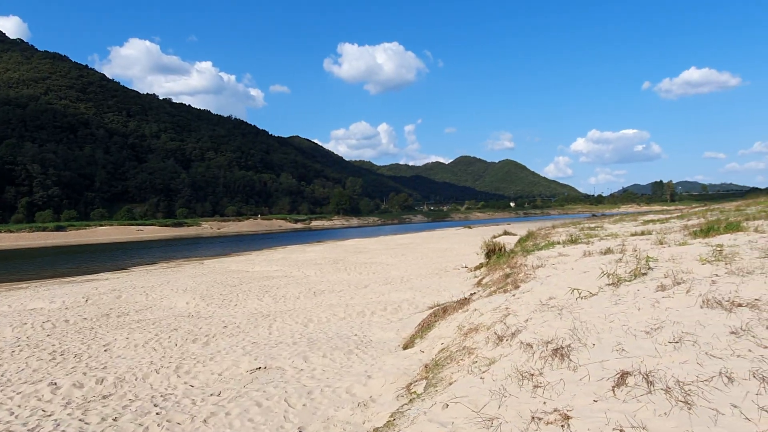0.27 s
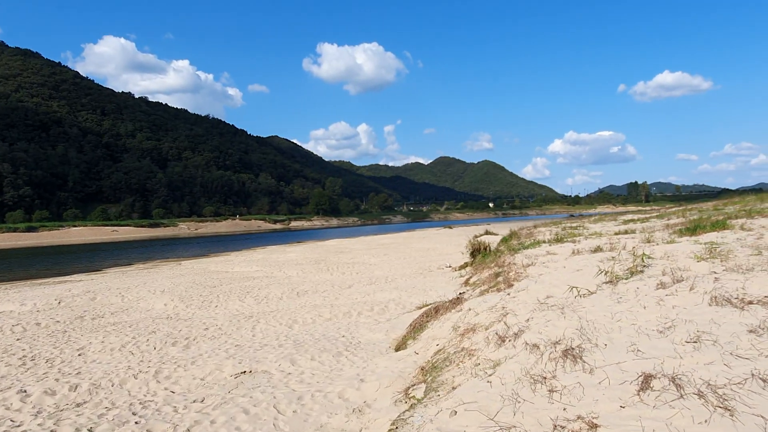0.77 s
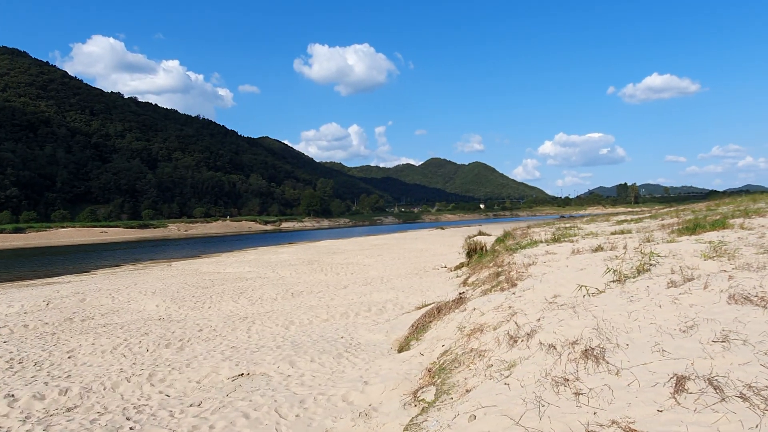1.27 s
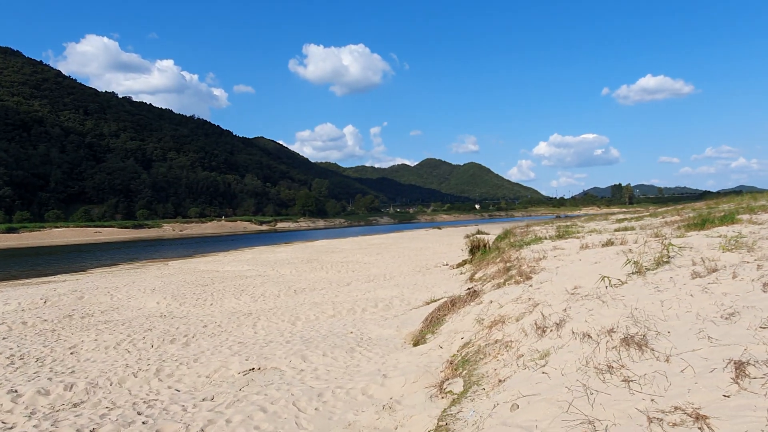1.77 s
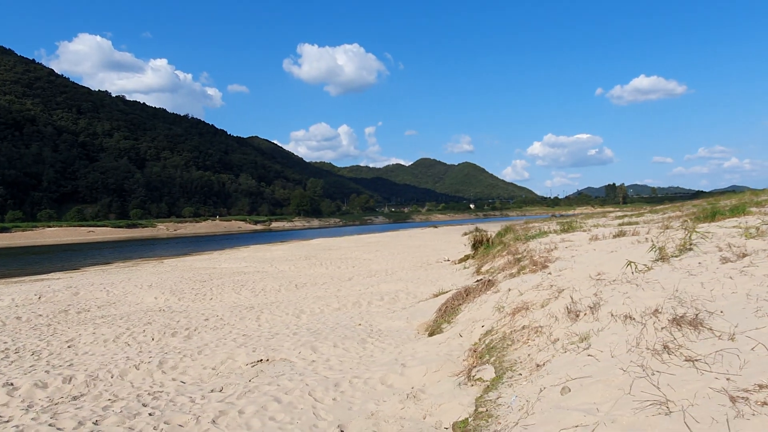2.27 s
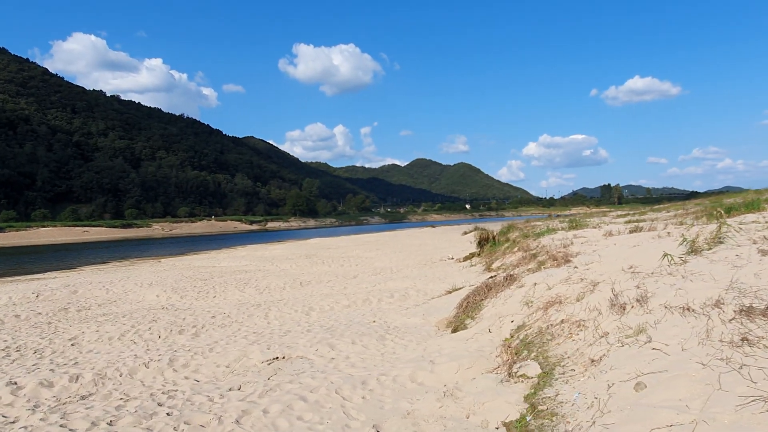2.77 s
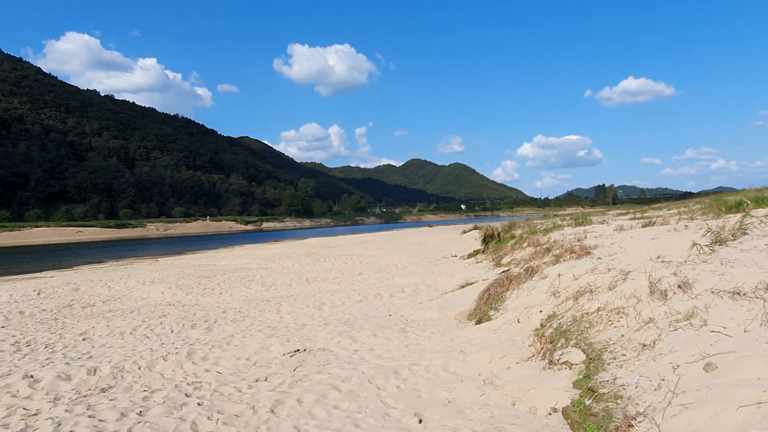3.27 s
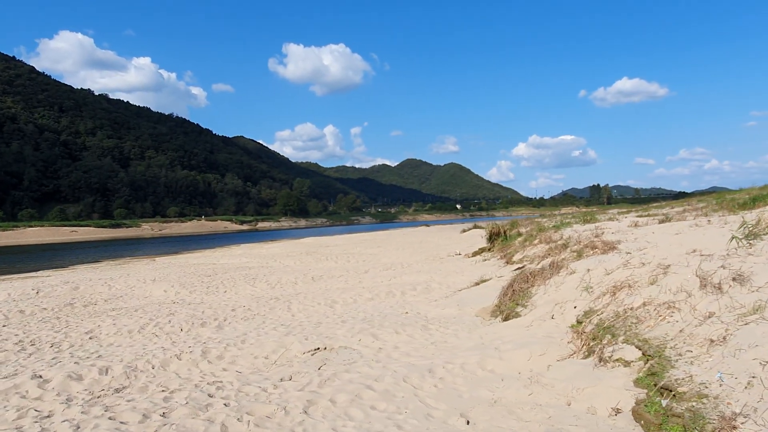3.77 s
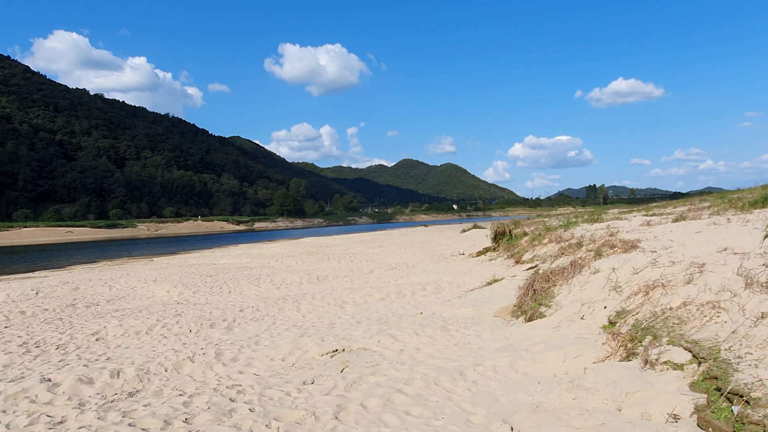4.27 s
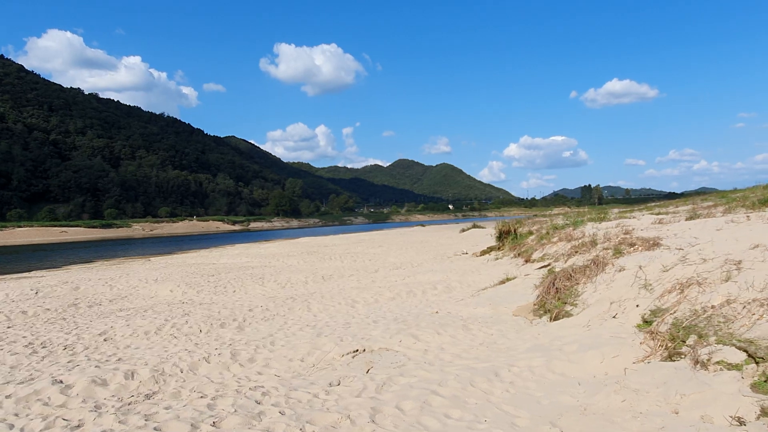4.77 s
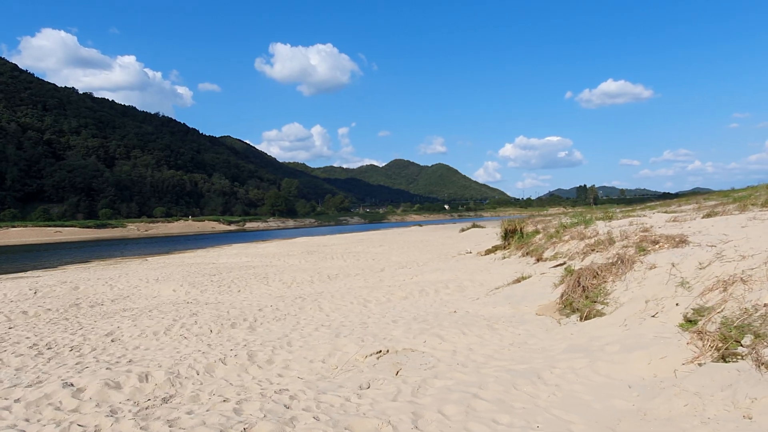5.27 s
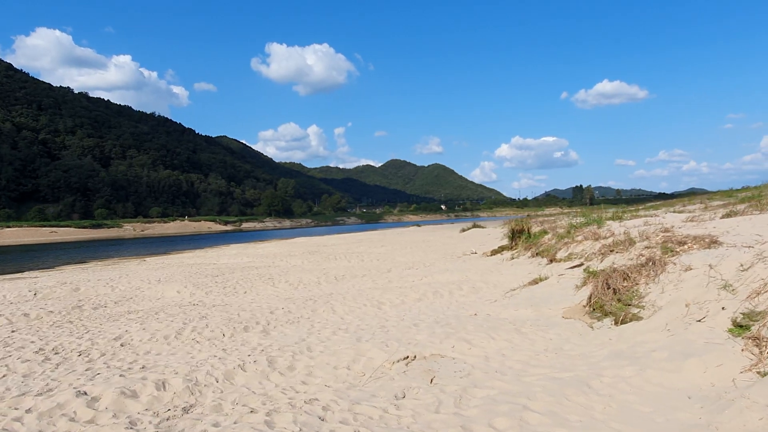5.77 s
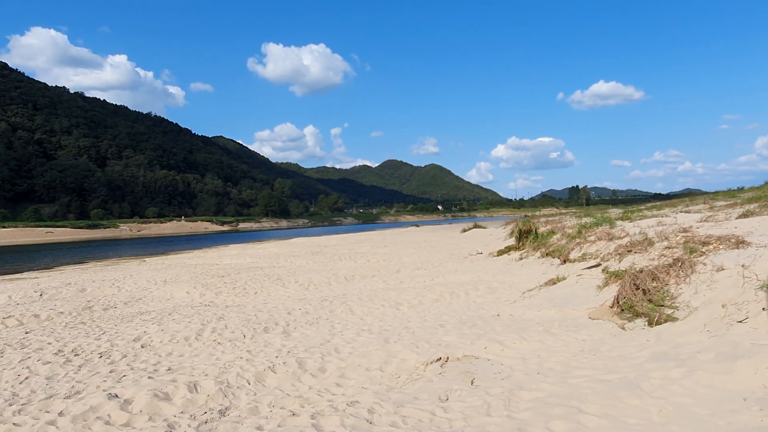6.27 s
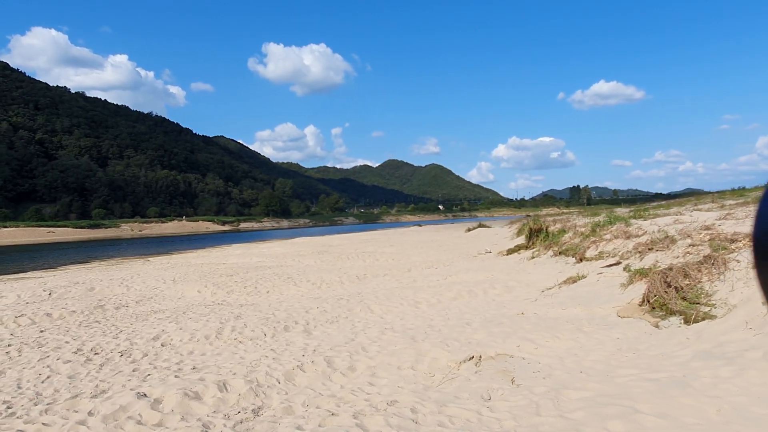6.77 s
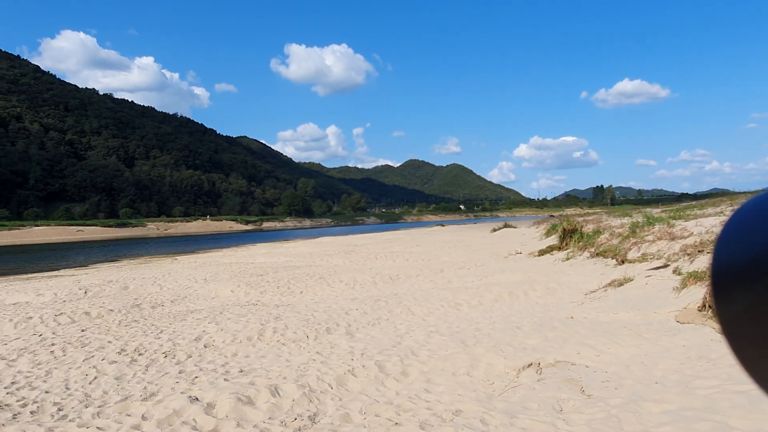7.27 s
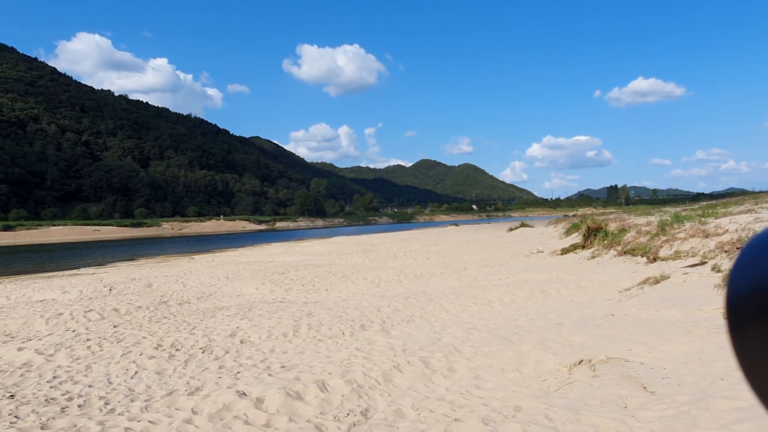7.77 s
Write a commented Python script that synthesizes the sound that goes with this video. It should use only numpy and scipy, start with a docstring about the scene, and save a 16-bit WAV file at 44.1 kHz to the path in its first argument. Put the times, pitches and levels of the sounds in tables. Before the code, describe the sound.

Five deep, throbbing bullfrog croaks sound nearby over a soft river murmur and the faint peeping of small frogs.

```python
"""Bullfrog on a river bank

A close bullfrog gives five long, rattling croaks, each in two or three throbs. Every snap of its vocal
folds is a short falling chirp that rings in throat and vocal sac, about a hundred times a second.
Small frogs peep and hoarse calls drift in from far off, wind bumps the microphone, air rushes over
the bank, and the river murmurs under a thin hiss and a few faint ticks."""
import sys
import numpy as np
from scipy import signal
from scipy.fft import rfft, irfft, next_fast_len
from scipy.io import wavfile
from scipy.ndimage import uniform_filter1d

SR = 44100
rng = np.random.default_rng(int(sys.argv[2]) if len(sys.argv) > 2 else 0)


def output_pcm(signal):
    """Save a mono or channel-first signal as 16-bit PCM at the path in sys.argv[1].

    Samples are clipped to [-1, 1] before scaling.
    """
    pcm = np.clip(np.atleast_2d(signal).T, -1, 1) * 32767
    wavfile.write(sys.argv[1], SR, np.round(pcm).astype(np.int16))


N = 353196
TIME = np.arange(N) / SR

# The croaks. Each row: start and end in seconds, level in dB, fade across the croak in dB, rasp in dB,
# share of the croak at which the membranes ring fully, roughness, chirp sweep in seconds,
# side angle as a factor on the left port's lead, left-right balance in dB.
CROAKS = [(0.463, 1.541, -0.5, -0.5, 0.5, 0.76, 12.5, 0.0027, 0.86, -2),
          (2.058, 3.002, 0, 3, 0.5, 0.65, 14, 0.0028, 0.96, -3.5),
          (3.544, 4.415, 0.33, 6, 2.5, 0.64, 14.5, 0.0026, 1.12, -2.5),
          (4.975, 5.751, 0.5, 6.5, 2, 0.57, 13.5, 0.0027, 1.08, -3.5),
          (6.366, 7.161, 0.5, 5.5, 0.5, 0.63, 9.5, 0.0037, 0.73, -3)]
# Snap rate, by croak. Each row: opening and top rate in Hz, shares of the croak where it rises and droops.
PITCH_ARCHES = [(97.2, 101.3, .54, .8), (97.8, 102.3, .52, .79), (98.2, 102.8, .4, .77),
                (98.4, 102.8, .4, .78), (97.8, 101.2, .38, .73)]
# Mouth colour, by croak. Each row: nasal peak in Hz, its gain in dB, hollow in Hz, its gain in dB.
MOUTHS = [(1900, 7.5, 1870, -1), (1790, 3.5, 2430, -5.5), (1450, 6, 1800, 4.5), (1940, 7, 2430, -7.5),
          (1930, 6.5, 3200, -1)]
# Lows and highs, by croak. Each row, in dB: boom, membrane ring before the sac stretches,
# overtones before, overtones after.
TONE_TRIMS = [(-1, -18, -18, -2.5), (-1.5, -17.5, -10, 3), (0, -10.5, -6, 4.5), (0.5, -12.5, -3, -1),
              (-2, -15.5, -9.5, -4.5)]
# Hard snaps that crack out of the rattle. Each row: time in seconds, accent in dB.
HARD_SNAPS = [(0.6277, 0.5), (.658, 3.5), (0.6991, 3.5), (0.762, 2.5), (0.803, 3), (.843, 3.5), (0.875, 4),
              (0.9768, 0), (1.0486, 0), (1.1501, 1), (2.212, 3), (2.2533, 2.5), (2.2934, 2), (2.325, 2),
              (2.3553, 2), (2.3963, 2), (2.4165, 5), (2.5084, -1), (3.6646, 4), (3.7063, 4.5), (3.736, 0.5),
              (3.7768, 0.5), (3.837, 2), (3.9189, 1.5), (3.989, 3.5), (5.099, 3), (5.1294, 0.5),
              (5.2715, 1), (5.342, 2), (5.4511, 3), (6.487, -2.5), (6.5185, 0.5), (6.549, 1), (6.6613, 0),
              (6.762, 4), (6.9508, 1.5)]
# The lungs slacken once or twice a croak, parting it into two or three throbs.
# Each row: time of the new push in seconds, length of the slack in seconds, relative depth.
SLACKS = [(0.974, 0.091, 1), (1.216, 0.062, 0.5), (2.504, 0.11, 0.5), (2.724, 0.054, 0.5),
          (3.911, 0.098, 0.5), (4.12, 0.046, 0.3), (5.33, 0.1, 0.3), (5.494, 0.064, 0.5), (6.756, 0.11, 0),
          (6.949, 0.061, 0.5)]
# Colour of a snap in the tight sac and in the swollen one. Each row: frequency in Hz, gain in dB.
TIGHT_EQ = [(120, -73), (230, -28.5), (320, -9), (520, 1), (680, -7), (860, -4.5), (1100, 8), (1330, -12.5),
            (1650, -10), (2350, -19), (2850, -11.5), (3500, -42), (4200, -26), (4800, -37), (5500, -60)]
SWOLLEN_EQ = [(120, -48), (230, -12), (320, -7.5), (560, -4), (900, 18.5), (1550, 10), (2000, 7),
              (2400, 12), (2750, 14.5), (3150, 10), (3500, -2), (3850, -9), (4350, -17.5), (5800, -41)]
# Resonances and dips of the swollen sac and eardrums. Each row: centre in Hz, width in Hz, gain in dB.
SAC_RESONANCES = [(369, 180, 12), (570.3, 80, 15.5), (694, 34, 13), (832, 230, -3), (885, 24, 4.5),
                  (1020, 60, -2.5), (1170, 116, 8.5), (1354, 122, -9.5), (1618, 36, 5.5), (1556, 290, 3),
                  (3740, 170, 10)]
# Crossovers in Hz: the tops of the boom, chest, throat, nasal core and rasp bands.
CROSSOVERS_HZ = [540, 950, 1350, 2350, 4200]
# Envelopes of those five bands, the membrane ring and its overtones. Each row: level in dB, shares of
# the croak where it is open and starts closing, attack depth in dB, sag in dB per croak,
# release depth in dB, dip in dB per unit of slack.
BAND_ENVELOPES = [(-42.5, 0.36, 0.886, 33, -2.5, 43, 15), (-38.5, 0.31, 0.77, 35, 6, 85, 2.5),
                  (-36.5, 0.15, 0.79, 31, 1, 90, 2.8), (-28.5, 0.26, 0.73, 60.5, 3.5, 47, 13.8),
                  (-32.5, 0.29, 0.74, 77, 3, 52, 14.3), (-41, 0.34, 0.78, 113, 7.5, 84, 18),
                  (-52.5, 0.31, 0.81, 90, 10.5, 106, 26)]
# Membrane resonances slide down as the sac stretches. Each row: share of the croak, then in Hz
# lower ring, upper ring, lower overtone, upper overtone and their common width.
RING_GLIDE = [(0, 5600, 6000, 7200, 8600, 700), (.24, 5480, 5720, 7000, 8300, 330),
              (.36, 5150, 5420, 6850, 7700, 280), (.48, 4780, 5220, 6450, 7250, 140),
              (.62, 4700, 5170, 6350, 6980, 105), (.75, 4630, 5050, 6350, 6950, 105),
              (.9, 4590, 4800, 6200, 6850, 190)]
# Balance of those four resonances in dB, in the same order.
RING_MODES_DB = [-0.5, -2, 2.5, 0.5]
# Reflections off the water and the near bank. Each row: delay in seconds, gain in dB.
ECHOES = [(.0033, -15), (.0054, -18.5)]
# The frog at the two microphone ports. Each row: frequency in Hz, left lead in radians, balance in dB.
PORTS = [(101, .1, 32), (326, 0.64, -3.5), (560, 0.99, 1), (1380, 1.88, 6.5), (1970, 1.78, 4.5),
         (2695, 3.65, 3), (3060, 4.26, 5.5), (5330, 6.9, 1), (6820, 9.25, 7.5)]

# Bouts of the small frogs. Each row: time and half width in seconds, level in dB, pitch in Hz.
CHORUS_BOUTS = [(.03, 0.081, -46, 2700), (0.224, 0.065, -37, 2686), (0.346, 0.029, -37.5, 2824),
                (.55, 0.055, -43, 2660), (0.68, 0.052, -31.5, 2610), (1.64, 0.081, -66, 2640),
                (1.82, 0.041, -47, 2876), (1.97, 0.063, -41, 2828), (2.16, 0.046, -46, 2753),
                (2.28, 0.054, -35.5, 2840), (2.91, 0.059, -43, 2948), (3.07, 0.047, -49.5, 2887),
                (3.23, 0.042, -45, 2887), (3.41, .035, -49.5, 2843), (3.63, 0.059, -43.5, 2830),
                (4.18, 0.067, -36, 2745), (4.379, 0.045, -45.5, 2500), (4.592, 0.031, -44, 2507),
                (4.88, 0.093, -40.5, 2810), (5.06, 0.043, -40.5, 2840), (5.659, .03, -41, 2590),
                (5.88, 0.11, -45, 2823), (6.199, 0.035, -49.5, 2820), (6.39, 0.07, -51.5, 2614),
                (7.2, 0.077, -49, 2763), (7.46, 0.037, -51.5, 2640), (7.69, 0.073, -45, 2858),
                (7.85, 0.065, -44.5, 2705)]
# Lone far whistles. Each row: start and length in seconds, pitch and glide in Hz, level in dB.
WHISTLES = [(1.705, 0.073, 1950, 71, -57), (3.418, 0.043, 1986, 28, -60), (4.413, 0.041, 2080, 162, -58),
            (5.738, 0.073, 2050, 143, -61), (6.008, 0.019, 2136, -34, -51), (7.43, 0.091, 2114, 117, -61),
            (7.8, 0.11, 1183, 16, -51)]
# Hoarse far calls. Each row: time and half width in seconds, pitch in Hz, level in dB.
FAR_CALLS = [(.04, 0.043, 1610, -62), (.15, 0.043, 1170, -48.5), (.28, 0.12, 1020, -55.5),
             (1.69, .04, 1130, -50), (4.66, 0.04, 1050, -58), (5.85, 0.062, 1820, -74),
             (6.15, 0.088, 1700, -64), (7.29, 0.034, 1080, -53.5), (7.3, 0.032, 1690, -61),
             (7.52, .028, 1430, -54), (7.66, 0.06, 1050, -53)]
# Dry ticks and dull taps. Each row: start in seconds, centre in Hz, level in dB, decay in seconds.
TICKS = [(.022, 280, -40, 0.021), (.43, 594, -44.5, 0.012), (1.68, 550, -37, 0.014),
         (2.414, 9100, -44.5, .003), (4.962, 2010, -59, .008), (5.924, 347, -41, 0.01)]
# Sharp bumps of wind. Each row: time and width in seconds, level in dB.
BUFFETS = [(1.269, 0.00052, -22), (1.302, 0.00097, -26.5), (1.677, 0.0013, -20), (2.006, 0.0014, -22),
           (2.154, .0022, -23), (2.188, 0.00067, -24), (2.236, 0.0024, -16), (3.213, 0.00034, -30)]

# Colours of the noise beds. Each row: frequency in Hz, relative gain in dB.
WIND_EQ = [(20, -31), (45, -2.5), (70, 1.5), (100, -5.5), (150, -15.5), (250, -20.5), (450, -17),
           (1000, -88), (3000, -97)]
RUSH_EQ = [(100, -38), (220, -30.5), (350, 0.5), (550, -4.5), (850, -9), (1400, -29), (4000, -41)]
RUSTLE_EQ = [(1000, -25), (3400, -1), (6500, -7), (9000, -5), (15000, -19)]
RIVER_EQ = [(30, -66), (200, -11.5), (370, 9.5), (700, 5.5), (1100, 9), (1500, 0), (2100, -5), (3200, -7.5),
            (4200, -38.5), (7000, -29.5), (15000, -17.5)]
HISS_EQ = [(1000, -49), (4000, -8), (7500, -12), (8500, -8.5), (10500, -8.5), (12500, -4.5), (14000, 2.5),
           (15000, -35), (16000, 6)]
# Fader rides of the beds. Each row: time in seconds, level in dB.
WIND_FADER = [(0, -60), (1.1, -47), (1.6, -46.5), (2.2, -47), (2.8, -42), (3.1, -55), (4.45, -64.5),
              (4.85, -48), (5.8, -63.5), (6.2, -64), (7.0, -58), (7.35, -70.5), (8, -69)]
RUSH_FADER = [(0, -74), (1.55, -76), (2.2, -44), (3.3, -48.5), (4.45, -57), (4.9, -51), (5.8, -58.5),
              (7.2, -61), (8, -66)]
RIVER_FADER = [(0, -53), (.35, -56), (1.65, -50.5), (3.1, -54), (3.45, -55.5), (4.55, -56.5), (4.9, -53),
               (6.1, -57.5), (7.3, -58), (7.6, -54), (8, -54)]
HISS_FADER = [(0, -65), (1, -56), (1.9, -62.5), (2.8, -57), (4, -55.5), (4.8, -63.5), (6.7, -58.5),
              (8, -65)]
# Short swells on top of the beds. Each row: time and half width in seconds, level in dB.
WIND_SWELLS = [(.03, 0.053, -44.5), (.28, 0.043, -42.5), (1.1, 0.013, -42), (1.27, 0.027, -44),
               (1.59, 0.047, -37.5), (1.87, 0.026, -38), (2.01, 0.053, -33.5), (2.225, 0.025, -26.5),
               (2.419, 0.012, -34), (2.67, 0.066, -38), (2.85, 0.05, -37), (3.72, 0.027, -41.5),
               (3.91, 0.052, -37.5), (4.14, 0.024, -44), (5.44, 0.015, -41), (5.58, 0.029, -45),
               (7.07, 0.068, -44), (7.62, 0.032, -50.5)]
RUSTLES = [(.33, 0.041, -72.5), (3.35, 0.23, -71.5), (4.66, 0.059, -67), (7.17, 0.064, -67),
           (7.65, 0.075, -68.5)]
HISS_SWELLS = [(.665, 0.033, -45.5), (1.38, 0.08, -51.5), (2.57, 0.21, -55), (3.37, 0.071, -56.5),
               (5.27, 0.12, -51), (6.26, 0.017, -62), (7.11, .04, -52.5)]


def bullfrog():
    """Five croaks, placed to one side and scattering faintly along the bank."""
    out = np.zeros((2, N))
    for row, pitch_arch, mouth, trims in zip(CROAKS, PITCH_ARCHES, MOUTHS, TONE_TRIMS):
        start, end, level_db, tiring_db, *voice, angle, pan_db = row
        span = slice(int(start * SR), int(end * SR))
        call = croak(TIME[span], pitch_arch, mouth, trims, *voice)
        gain = from_db(level_db + tiring_db * np.linspace(.5, -.5, len(call)))
        out[:, span] += at_ports(call * gain, angle, pan_db)
    return out + from_db(-15.5) * scatter(out, t60=0.18, dull_hz=3700)


def croak(t, pitch_arch, mouth, trims, rasp_db, ring_at, roughness, sweep_s):
    """One croak: chirping snaps ring in sac and membranes, each band on its own envelope."""
    stage = np.linspace(0, 1, len(t))   # share of the croak gone by
    pitch = snap_rate(stage, *pitch_arch)
    slack = sum(np.interp(t, [s - length_s, s - length_s / 2, s, s + .005], [0, depth, depth, 0])
                for s, length_s, depth in SLACKS)
    spectrum, hz = falling_chirps(fold_snaps(t, pitch, roughness), sweep_s)
    bands = vocal_sac(spectrum, hz, stage, *mouth) + membranes(irfft(spectrum)[:len(t)], stage)
    boom_db, held_db, *overtones_db = trims
    stretching = [ring_at - .18, ring_at]   # the ring is held back until the sac is stretched
    ring_db = np.interp(stage, stretching, [held_db, 0])
    trims_db = [boom_db, 0, 0, 0, rasp_db, ring_db, np.interp(stage, stretching, overtones_db)]
    out = sum(evened(band, span_s=0.055) * from_db(band_envelope(stage, slack, *shape) + db)
              for band, shape, db in zip(bands, BAND_ENVELOPES, trims_db))
    out += closing_note(bands[0], pitch, stage)
    return out * np.interp(stage, [0, .03, .96, 1], [0, 1, 1, 0])


def snap_rate(stage, low_hz, top_hz, rises_at, droops_at, rise_share=.21, droop_hz=15):
    """The pitch of the rattle: level at first, up a step, then falling ever faster."""
    rise = np.interp(stage, [rises_at, rises_at + rise_share], [low_hz, top_hz])
    return rise - droop_hz * np.interp(stage, [droops_at, 1], [0, 1]) ** 2


def fold_snaps(t, pitch, roughness, flutter_hz=28.5, puff_decay_s=.0011):
    """The folds snap in a fluttering beat that crests at the hard snaps and settles toward the close."""
    size = len(t)
    hard_s, accent_db = np.transpose([row for row in HARD_SNAPS if t[0] < row[0] < t[-1]])
    hard = ((hard_s - t[0]) * SR).astype(int)
    cycles = in_step(np.cumsum(pitch) / SR, hard)
    at = np.interp(np.arange(1, int(cycles[-1])), cycles, np.arange(size))
    chance, timing = rng.standard_normal((2, 256))[:, :len(at)]
    accented = np.abs(at[:, None] - hard).argmin(axis=0)
    chance[accented] = 0
    rough = roughness * np.interp(at / size, [0, .3, .55, .9], [1.7, 1.4, 1, .6])
    crest = np.cos(2 * np.pi * in_step(flutter_hz * (t - t[0]), hard)[at.astype(int)])
    level_db = rough * (.1 * crest + .06 * np.clip(chance, -1.5, 1.5))
    level_db[accented] += accent_db
    strength = from_db(level_db)
    jitter_s = .000019 * rough * np.interp(at / size, [0, .3, .5, .8, .9], [1.1, .9, .6, .45, .2])
    at = np.clip(at + jitter_s * SR * timing, 0, size - 2)
    before, part = at.astype(int), at % 1   # each click is split between two samples
    clicks = np.bincount(before, strength * (1 - part), size)
    clicks += np.bincount(before + 1, strength * part, size)
    # a short puff of turbulent air gives each snap a colour of its own
    puffs = signal.lfilter([1], [1, -np.exp(-1 / (puff_decay_s * SR))], clicks + 1e-18)
    breath = .1 * np.interp(np.arange(size) / size, [.75, .9], [1, .35])
    return clicks + breath * puffs * rng.standard_normal(size)


def falling_chirps(snaps, sweep_s, knee_hz=200, on_time_hz=1800, size=2 ** 16):
    """Lows leave later than highs, so each snap chirps down; gives the spectrum, near echoes included."""
    hz = np.fft.rfftfreq(size, 1 / SR)
    late_s = sweep_s * ((on_time_hz + knee_hz) / (hz + knee_hz) - 1)
    chirps = rfft(snaps, size) * np.exp(-2j * np.pi * np.cumsum(late_s) * hz[1])
    echoes = sum(from_db(db) * np.exp(-2j * np.pi * hz * s) for s, db in ECHOES)
    return chirps * (1 + echoes), hz


def vocal_sac(spectrum, hz, stage, nasal_hz, nasal_db, hollow_hz, hollow_db, mouth_width_hz=330):
    """The sac fills and slackens: five bands crossfade from its tight colour to its swollen and back."""
    mouth = [(nasal_hz, mouth_width_hz, nasal_db), (hollow_hz, mouth_width_hz, hollow_db)]
    peaks_db = sum(db / (1 + (2 * (hz - f) / width) ** 2) for f, width, db in SAC_RESONANCES + mouth)
    tight = spectrum * causal(at_hz(TIGHT_EQ, hz) + 0.22 * peaks_db)
    swollen = spectrum * causal(at_hz(SWOLLEN_EQ, hz) + peaks_db)
    filled = np.interp(stage, [.28, .5, .86, .94], [0.045, 1.0, 0.38, 0.025])
    lowpasses = [0] + [1 / (1 + (hz / edge) ** 12) for edge in CROSSOVERS_HZ]
    bands = []
    for low, high in zip(lowpasses, lowpasses[1:]):
        tight_band, swollen_band = irfft(np.array([tight, swollen]) * (high - low))[:, :len(stage)]
        bands.append((1 - filled) * tight_band + filled * swollen_band)
    return bands


def membranes(snaps, stage, raggedness=.8, fringe_hz=(6800, 8940)):
    """Snaps strike four sliding resonances: a ringing pair, and two overtones fringed with air."""
    *centres, width_hz = in_time(RING_GLIDE, stage)
    blows = snaps * (1 + raggedness * rng.standard_normal(len(snaps)))
    rings = [gliding(gliding(blows, hz, width_hz), hz, width_hz) for hz in centres]
    lower, upper, third, fourth = (from_db(db) * evened(ring, span_s=.05)
                                   for ring, db in zip(rings, RING_MODES_DB))
    fourth *= from_db(np.interp(stage, [.4, .7], [-9, 0]))   # the highest one speaks last
    throb = uniform_filter1d(snaps ** 2, int(.004 * SR))
    fringe = bandpass(throb * rng.standard_normal(len(snaps)), fringe_hz, order=3)
    return [lower + upper, third + fourth + from_db(-5) * evened(fringe, span_s=0.066)]


def band_envelope(stage, slack, level_db, opened, closes, attack_db, sag_db, release_db, dip_db):
    """Attack, tilted hold and release of one band in dB, dipping where the lungs slacken."""
    hold = level_db - sag_db * np.maximum(stage - opened, 0) - dip_db * slack
    attack = attack_db * np.interp(stage, [0, opened], [1, 0]) ** 2
    release = release_db * np.interp(stage, [closes, 1], [0, 1]) ** 2
    return hold - attack - release


def closing_note(boom, pitch, stage):
    """A hollow tail: the slack sac picks the fourth harmonic out of its boom and lets it ring."""
    note = gliding(gliding(boom, 4 * pitch, width_hz=70), 4 * pitch, width_hz=70)
    return evened(note, span_s=0.046) * from_db(-47) * bell(stage, centre=.853, half_width=.052)


def at_ports(x, angle, pan_db):
    """The left port hears the sound a little earlier, and each colours it in its own way."""
    size = next_fast_len(len(x), True)
    lead, tilt_db = in_time(PORTS, np.fft.rfftfreq(size, 1 / SR))
    half = from_db((tilt_db + pan_db) / 2) * np.exp(.5j * angle * lead)
    return irfft(rfft(x, size) * np.array([half, 1 / half]), size)[:, :len(x)]


def small_frogs(count=1100, spread_hz=115, glide_hz=110, length_s=0.032, bed_db=-59.5, bed_hz=2740):
    """A far chorus of short peeps, gliding up or down; the loudest bout of the moment leads the pitch."""
    powers = [np.full(N, from_db(bed_db) ** 2)]
    powers += [from_db(db) ** 2 * bell(TIME, s, width_s) for s, width_s, db, _ in CHORUS_BOUTS]
    centre_hz = np.dot([bed_hz] + [hz for *_, hz in CHORUS_BOUTS], powers) / np.sum(powers, axis=0)
    peeps = np.zeros(N + SR)
    for k, (when, pitch, loudness, glide) in enumerate(rng.standard_normal((count, 4))):
        at = int(np.clip((k + when) / count, 0, 1) * (N - 1))
        hz = centre_hz[at] + spread_hz * np.clip(pitch, -2, 2)
        note = from_db(3.5 * loudness) * whistle(length_s, hz, glide_hz * glide)
        peeps[at:at + len(note)] += note
    peeps = peeps[:N]
    chorus = np.array([peeps, delayed(peeps, -0.00014)]) + 0.23 * scatter(peeps, t60=0.47, dull_hz=5230)
    return evened(chorus, span_s=.09) * swelling(bed_db, CHORUS_BOUTS)


def lone_whistles():
    """A few lower frog whistles stand apart from the chorus, each with a soft tail."""
    out = np.zeros(N)
    for s, length_s, hz, glide_hz, db in WHISTLES:
        note = from_db(db) * whistle(length_s, hz, glide_hz)
        out[int(s * SR):int(s * SR) + len(note)] += note
    return out + .5 * scatter(out, t60=0.34, dull_hz=3960)


def whistle(length_s, hz, glide_hz):
    """A soft-edged gliding note."""
    u = np.linspace(0, 1, int(length_s * SR))
    return np.sin(np.pi * u) * np.sin(2 * np.pi * np.cumsum(hz + glide_hz * (u - .5)) / SR)


def far_calls(width_hz=220):
    """Hoarse calls from far along the river, blurred by distance into short narrow swells."""
    out, white = np.zeros((2, N)), rng.standard_normal((3, N))
    for s, width_s, hz, db in FAR_CALLS:
        hoarse = bandpass(white[:2] + white[2], [hz - width_hz / 2, hz + width_hz / 2])
        out += from_db(db) * bell(TIME, s, width_s) * rms_one(hoarse)
    return out


def wind(lumps_db=3.5):
    """Lumpy eddies on the microphone, stronger on the left, with a few sharp buffets."""
    eddies = noise(WIND_EQ) * from_db(lumps_db * noise([(1, -1), (25, 4), (60, -53), (200, -120)]))
    out = evened(eddies, span_s=0.2) * swelling(in_time(WIND_FADER)[0], WIND_SWELLS)
    for s, width_s, db in BUFFETS:
        u = (TIME - s) / width_s
        out += from_db(db) * u * np.exp(-np.minimum(u * u, 50) / 2) * [[1], [.4]]
    return out * from_db([[1.2], [-2.2]])


def bank_air(flutter_db=4.0):
    """Air rushes softly over the bank, with a light rustle now and then."""
    flutter = flutter_db * noise([(1, -20), (12, 0), (45, -3), (120, -60)])[0]
    rush = noise(RUSH_EQ) * from_db(in_time(RUSH_FADER)[0] + flutter)
    return rush + noise(RUSTLE_EQ) * swelling(-97, RUSTLES)


def river(crossfeed=0.16, ripple_db=3.0):
    """The river's rippling murmur, shared in part by both ears."""
    water = noise(RIVER_EQ)
    ripple = from_db(ripple_db * noise([(1, -83), (30, -12), (80, -4), (200, -120)]))
    return rms_one(water + crossfeed * water[::-1]) * ripple * from_db(in_time(RIVER_FADER)[0])


def hiss():
    """A thin high hiss, leaning right, that swells now and then."""
    return noise(HISS_EQ) * swelling(in_time(HISS_FADER)[0], HISS_SWELLS) * from_db([[-.5], [5.5]])


def ticks():
    """Faint ticks and taps nearby: quickly dying bursts of noise, up to two octaves wide."""
    out, t = np.zeros((2, N)), TIME[:SR // 20]
    for s, hz, db, decay_s in TICKS:
        burst = rms_one(bandpass(rng.standard_normal((2, len(t))), [hz / 2, min(hz * 2, SR / 3)]))
        out[:, int(s * SR):int(s * SR) + len(t)] += from_db(db) * burst * np.exp(-t / decay_s)
    return out


def scatter(x, t60, dull_hz):
    """Diffuse echoes from banks and trees, different at each ear."""
    t = TIME[:SR]
    tail = rng.standard_normal((2, SR)) * from_db(-60 * t / t60) * (1 - np.exp(-t / 0.017))
    tail = signal.sosfilt(signal.butter(2, dull_hz, fs=SR, output="sos"), tail)
    return signal.fftconvolve(np.atleast_2d(x), tail / np.sqrt(np.sum(tail[0] ** 2)), axes=1)[:, :N]


def gliding(x, centre_hz, width_hz, size=128):
    """A resonance whose centre and width move, block by block."""
    radius = np.exp(-np.pi * width_hz / SR) * np.ones(len(x))
    out, state = np.zeros(len(x)), np.zeros(2)
    for i in range(0, len(x), size):
        r = radius[i]
        poles = [1, -2 * r * np.cos(2 * np.pi * centre_hz[i] / SR), r * r]
        out[i:i + size], state = signal.lfilter([1 - r, 0, r - 1], poles, x[i:i + size], zi=state)
    return out


def in_step(cycles, at):
    """A cycle count, nudged so that a beat lands on each of the given samples."""
    ahead = np.unwrap(2 * np.pi * cycles[at]) / (2 * np.pi)
    return cycles - np.interp(np.arange(len(cycles)), at, ahead - np.round(ahead[0]))


def causal(db):
    """A minimum-phase EQ: it rings only after the pulse."""
    cepstrum = irfft(db * np.log(10) / 20)
    half = len(cepstrum) // 2
    cepstrum[1:half] *= 2
    cepstrum[half + 1:] = 0
    return np.exp(rfft(cepstrum))


def noise(eq):
    """Coloured noise, unrelated in the two channels; rms 1."""
    size = next_fast_len(N, True)
    colour = from_db(at_hz(eq, np.fft.rfftfreq(size, 1 / SR)))
    return rms_one(irfft(rfft(rng.standard_normal((2, size))) * colour, size)[:, :N])


def evened(x, span_s):
    """A leveller: slow level changes are divided out."""
    power, size = np.atleast_2d(x ** 2).mean(0), int(span_s * SR)
    power = uniform_filter1d(uniform_filter1d(power, size), size)
    return x / np.sqrt(np.abs(power) + 1e-5 * power.mean() + 1e-20)


def swelling(bed_db, swells):
    """Gain over time of a bed with swells on top; their powers add."""
    power = sum(from_db(db) ** 2 * bell(TIME, s, width_s) for s, width_s, db, *_ in swells)
    return np.sqrt(from_db(bed_db) ** 2 + power)


def bell(t, centre, half_width):
    """A smooth swell of height 1."""
    return np.exp(-np.minimum(((t - centre) / half_width) ** 2, 50))


def in_time(rows, t=TIME):
    """A table's curves, read where its first column equals t."""
    knots, *columns = np.transpose(rows)
    return [np.interp(t, knots, column) for column in columns]


def at_hz(eq, hz):
    """An EQ curve in dB, read on a log-frequency axis."""
    f, db = np.transpose(eq)
    return np.interp(np.log(hz + 1), np.log(f), db)


def bandpass(x, edges_hz, order=2):
    return signal.sosfilt(signal.butter(order, edges_hz, "band", fs=SR, output="sos"), x)


def delayed(x, lag_s):
    return np.interp(np.arange(len(x)) - lag_s * SR, np.arange(len(x)), x)


def from_db(db):
    return 10 ** (np.asarray(db) / 20)


def rms_one(x):
    return x / np.sqrt(np.mean(x ** 2) + 1e-20)


def scene():
    """The bullfrog up front, far voices behind it, air and water all round."""
    voices = bullfrog() + small_frogs() + lone_whistles() + far_calls()
    return voices + wind() + bank_air() + river() + hiss() + ticks()


def record(dry):
    """A steep high cut at 15750 Hz."""
    return signal.sosfilt(signal.ellip(12, .1, 80, 15750, fs=SR, output="sos"), dry)


dry = scene()
out = record(dry)
output_pcm(out)
```